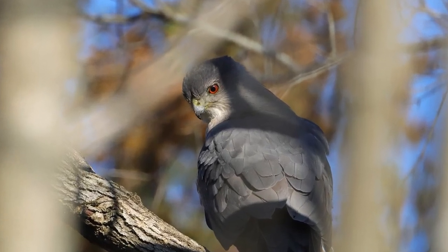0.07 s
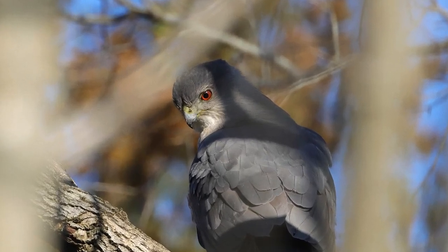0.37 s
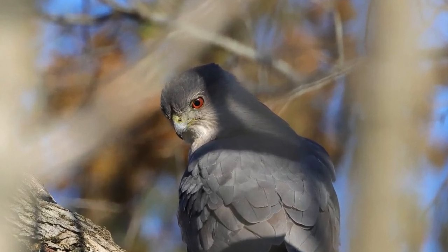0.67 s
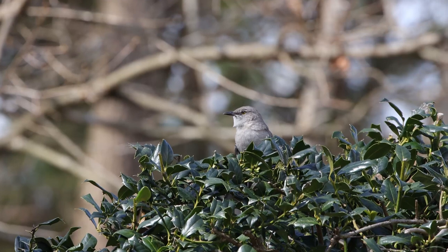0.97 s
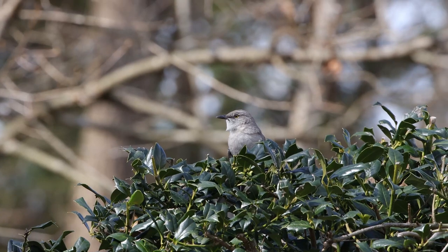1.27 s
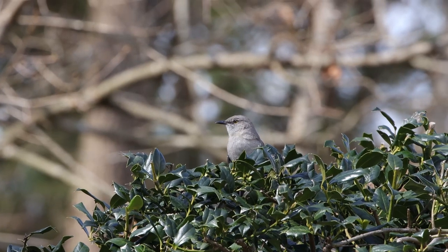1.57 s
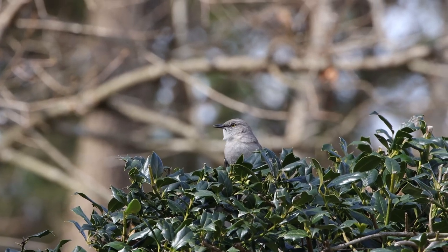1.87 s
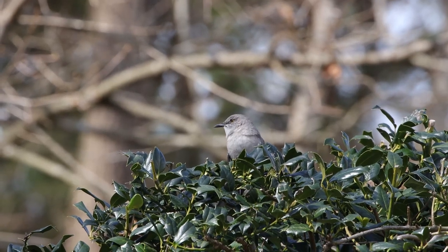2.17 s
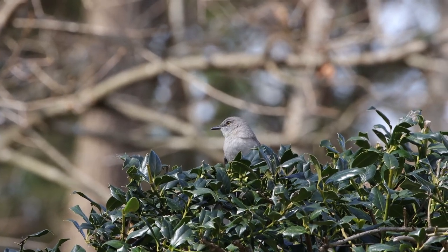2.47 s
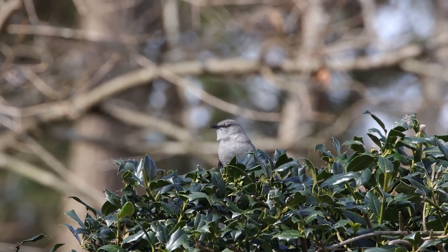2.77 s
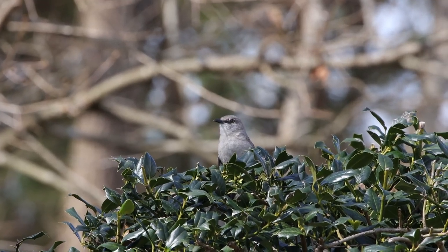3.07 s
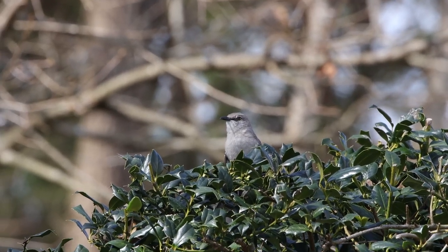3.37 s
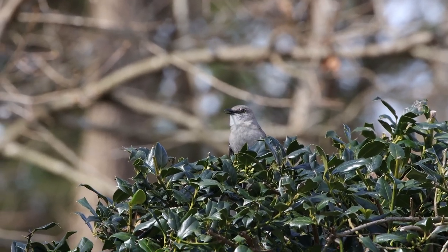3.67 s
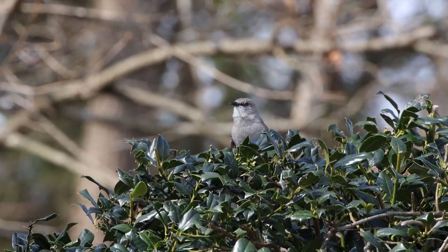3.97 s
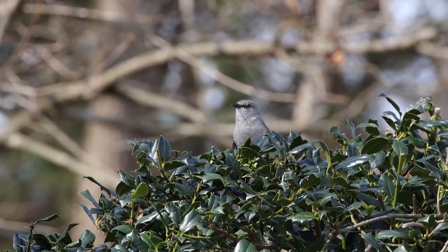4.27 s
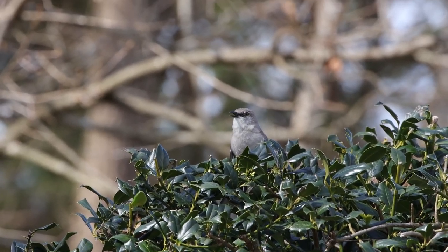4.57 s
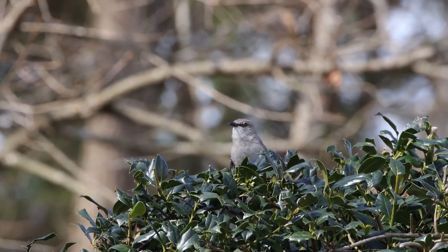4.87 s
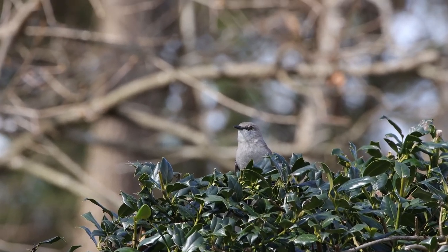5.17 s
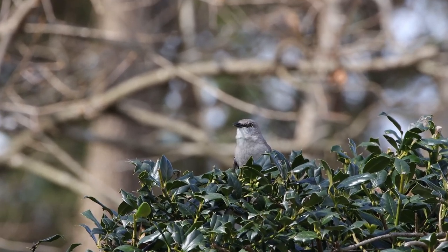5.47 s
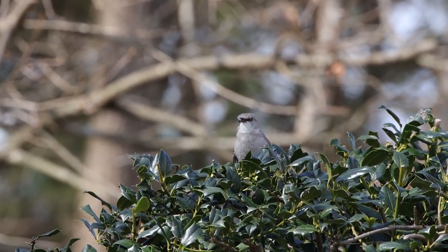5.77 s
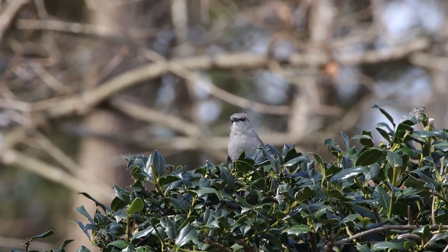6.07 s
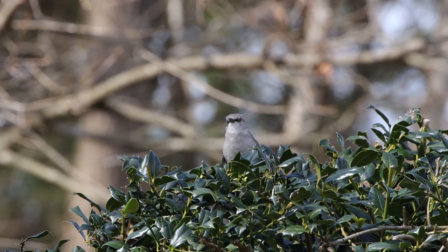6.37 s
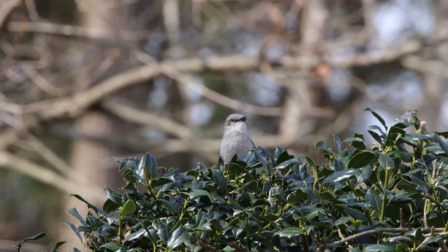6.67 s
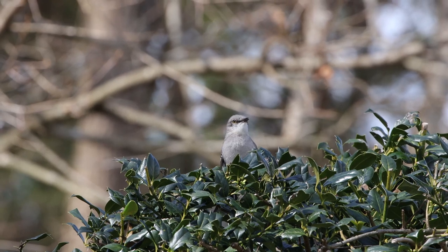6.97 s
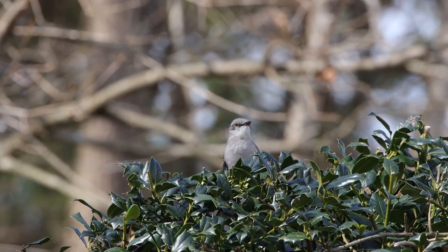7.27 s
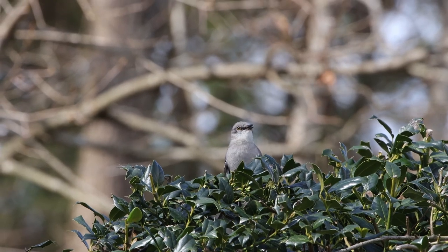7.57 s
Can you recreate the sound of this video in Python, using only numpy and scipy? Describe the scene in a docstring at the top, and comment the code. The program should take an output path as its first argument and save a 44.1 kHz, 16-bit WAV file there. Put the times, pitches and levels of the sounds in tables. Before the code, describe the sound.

Clear, gliding whistles from a close songbird in a wooded garden, with farther birds, a low traffic rumble and soft hiss behind.

```python
"""A wooded garden. A near songbird sings seven chip-and-whistle calls, then four phrases of downslur,
upslur and warble, and a last long upslur. Each note is a nearly pure, gliding tone from the syrinx.
A small bird gives thin high calls; others slur, trill, pip and rasp farther off, among faint dry ticks.
Trunks and foliage scatter the song over the rumble and drone of distant traffic and a steady hiss."""
import sys
import numpy as np
from scipy import signal
from scipy.fft import rfft, irfft, next_fast_len
from scipy.io import wavfile
from scipy.ndimage import uniform_filter1d, map_coordinates

SR = 44100
rng = np.random.default_rng(int(sys.argv[2]) if len(sys.argv) > 2 else 0)


def persist_wave(psi):
    """Save psi, clipped to +-1, as 16-bit WAV."""
    counts = np.round(np.clip(psi, -1, 1) * 32767).astype(np.int16)
    wavfile.write(sys.argv[1], SR, np.atleast_2d(counts).T)


N = 336483


def amp(db):
    return 10 ** (np.asarray(db) / 20)


def unit_rms(x):
    return x / np.sqrt(np.mean(x ** 2) + 1e-20)


def log_interp(points, hz):
    """Interpolate (f/Hz, value) points over log frequency."""
    knots_hz, values = np.transpose(points)
    return np.interp(np.log(hz + 1), np.log(knots_hz + 1), values)


def wobble(rate_hz, size):
    """Smooth random curve with rate_hz knots a second."""
    knots = rng.standard_normal(int(size * rate_hz / SR) + 4)
    return map_coordinates(knots, [np.arange(size) * rate_hz / SR])


def filtered(x, response):
    """Apply a complex frequency response."""
    size = next_fast_len(N + SR // 2)
    return irfft(rfft(x, size) * response(np.fft.rfftfreq(size, 1 / SR)), size)[..., :N]


def add(track, start_s, sound):
    part = track[max(round(start_s * SR), 0):][:len(sound)]
    part += sound[:len(part)]


def clock(length_s):
    return np.arange(int(length_s * SR)) / SR


def progress(length_s):
    return np.linspace(0, 1, int(length_s * SR))


# Left-right coherence of the background: f/Hz, coherence/1
COHERENCE = [(40, 0.9), (70, 0.99), (170, 0.93), (350, 0.89), (700, 0.45), (1400, 0), (4000, 0),
             (12000, 0.0092)]
def stereo_noise(spectrum, patchy_db):
    """Unit-rms noise with patches of random gain; the channels are alike in the bass only."""
    def mid_side_gains(hz):
        angle = np.arccos(np.clip(log_interp(COHERENCE, hz), -1, 1)) / 2
        return amp(log_interp(spectrum, hz)) * [np.cos(angle), np.sin(angle)]

    bins = signal.stft(rng.standard_normal((2, N)), nperseg=512)[2]
    patches = uniform_filter1d(rng.standard_normal(bins.shape[1:]), 6, axis=0)
    patches = unit_rms(uniform_filter1d(patches, 14, axis=1))
    pair = signal.istft(bins * amp(patchy_db * patches), nperseg=512)[1][:, :N]
    mid, side = filtered(pair, mid_side_gains)
    return unit_rms(np.array([mid + side, mid - side]))


# Background levels: t/s, rumble/dB, hiss/dB
BACKGROUND_LEVELS = [(0, -44, -52.5), (.1, -44, -53), (.57, -40, -48), (7.63, -40, -47)]
# Traffic spectrum: f/Hz, relative density/dB
RUMBLE_SPECTRUM = [(20, -24), (42, -20), (55, -7.5), (83, 0), (102, -5), (125, -1), (155, -2), (215, -7.5),
                   (340, -10), (520, -17.5), (800, -13.5), (1300, -21), (2200, -29), (4000, -73)]
# Engine drones: f/Hz, level/dB
ENGINE_DRONES = [(83, -48.5), (152, -54), (183, -53.5)]
# Hiss spectrum: f/Hz, relative density/dB
HISS_SPECTRUM = [(300, -28), (1000, 8.5), (2300, 12.5), (3300, 5.5), (4500, 2), (6500, -0.5), (9500, -2.5),
                 (12300, 1.5), (14000, -8.5), (15700, -21)]
def traffic_and_hiss():
    """Distant traffic rumbles and its engines waver under a gently flickering hiss."""
    t = np.arange(N) / SR
    knots_s, rumble_db, hiss_db = np.transpose(BACKGROUND_LEVELS)
    traffic_db = np.interp(t, knots_s, rumble_db)
    rumble = amp(traffic_db) * stereo_noise(RUMBLE_SPECTRUM, patchy_db=0.63)
    drone = sum(amp(db) * np.sin(2 * np.pi * hz * t + 1.68 * wobble(9, N)) for hz, db in ENGINE_DRONES)
    drone *= amp(traffic_db - traffic_db.max())
    flicker_db = .5 * wobble(6, N) + .5 * wobble(40, N)
    hiss = amp(np.interp(t, knots_s, hiss_db) + flicker_db) * stereo_noise(HISS_SPECTRUM, patchy_db=2.1)
    return (rumble + drone) * amp([[-.6], [.6]]) + hiss * amp([[-2], [1.5]])


def scatter(x, decay, delay_s):
    """Diffuse stereo echo; each frequency dies at its own rate."""
    hz, t, bins = signal.stft(rng.standard_normal((2, SR)), SR, nperseg=256)
    t60_s = log_interp(decay, hz)[:, None]
    tail = signal.istft(bins * amp(-60 * t / t60_s), SR, nperseg=256)[1]
    tail /= np.linalg.norm(tail[0])
    tail = np.pad(tail, ((0, 0), (int(delay_s * SR), 0)))
    return signal.fftconvolve(x[None], tail, axes=1)[:, :N]


# Foliage decay: f/Hz, T60/s
FOLIAGE_DECAY = [(1000, 1), (2500, 0.17), (8000, 0.15)]
# Woodland decay: f/Hz, T60/s
WOODS_DECAY = [(1000, 1.6), (2500, 0.81), (8000, 0.53)]
def garden_reverb(near, far, high):
    """Leaves scatter the song early and briefly, the woods later and for longer."""
    leaves = scatter(amp(-10.5) * near + amp(-2) * far + amp(-3) * high, FOLIAGE_DECAY, delay_s=.005)
    woods = scatter(amp(-16.5) * near + amp(-5.5) * far + amp(-12) * high, WOODS_DECAY, delay_s=.034)
    return (leaves + woods) * amp([[-1.5], [.5]])


# Trunk and ground reflections: delay/s, left/dB, right/dB
REFLECTIONS = [(.007, -20, -19), (.0125, -18, -15), (.022, -19, -18), (.031, -18, -18), (.044, -20, -20)]
def trunk_echoes(x):
    """Distinct echoes, each from its own side, that beat against the gliding notes."""
    skews_s = rng.normal(0, 0.00017, (len(REFLECTIONS), 2, 1))
    return filtered(x, lambda hz: sum(
        amp([[left_db], [right_db]]) * np.exp(-2j * np.pi * hz * (delay_s + skew_s))
        for (delay_s, left_db, right_db), skew_s in zip(REFLECTIONS, skews_s)))


def direct_path(x, left_db, right_db, left_lead_s):
    """Place a source by level and arrival-time difference."""
    return filtered(x, lambda hz: np.array([
        amp(left_db) * np.exp(2j * np.pi * hz * left_lead_s),
        amp(right_db) * np.ones_like(hz)]))


# Dry ticks: t/s, level/dB
TICKS = [(4.8344, -38), (5.1851, -39), (6.2113, -39), (6.3305, -35), (7.5294, -32)]
def ticks():
    """Tiny bright clicks: noise bursts that die in 8 ms."""
    out, t = np.zeros(N), clock(.02)
    for start_s, db in TICKS:
        add(out, start_s, amp(db - 9 - 60 * t / .008) * rng.standard_normal(len(t)))
    return filtered(out, lambda hz: amp(log_interp([(1000, -25), (4000, 0), (15000, -4)], hz)))


def syrinx(hz, overtone_db, jitter):
    """A bird's voice: a nearly pure tone with unsteady pitch and a weak octave."""
    phase = 2 * np.pi * np.cumsum(hz * (1 + jitter * wobble(410.6, len(hz)))) / SR
    return np.sin(phase) + amp(overtone_db) * np.sin(2 * phase)


def swell(u):
    """Rounded rise and fall over u = 0..1."""
    return np.sin(np.pi * u).clip(0) ** 0.35


def trill(length_s, first_hz, last_hz, swing_hz, rate_hz):
    """Hoarse glide with a fast pitch swing, loudest on each downstroke."""
    u = progress(length_s)
    cycle = 2 * np.pi * rate_hz * length_s * u + .9 * wobble(50, len(u))
    pitch = first_hz + (last_hz - first_hz) * u + swing_hz * np.cos(cycle)
    return swell(u) * (1 + 0.48 * np.sin(cycle)) * syrinx(pitch, overtone_db=-40, jitter=0.0152)


# Smooth slurs: t/s, length/s, first/Hz, last/Hz, level/dB
FAR_SLURS = [(0.076, 0.099, 2480, 2144, -37.5), (0.194, 0.082, 1973, 1830, -39),
             (0.352, .088, 2300, 2207, -31.5), (2.095, 0.081, 3270, 2850, -42.5),
             (4.467, 0.1, 1790, 2310, -43.5), (4.715, 0.0242, 4010, 4440, -33.5),
             (5.432, 0.12, 1777, 2414, -42.5), (5.704, 0.031, 3880, 4730, -36.5)]
# Very high pips: t/s, level/dB
FAR_PIPS = [(.158, -41.5), (2.246, -41.5), (5.11, -45)]
# Falling trill, then a lower buzz: t/s, first/Hz, trill/dB, buzz length/s, buzz/dB
FAR_SONGS = [(2.08, 4550, -52, .12, -44.5), (2.564, 4610, -45.5, 0.1, -55), (4.878, 4190, -45.5, 0.14, -49),
             (7.028, 4500, -42, .28, -39.5), (7.482, 4590, -37.5, 0.11, -42)]
# Trill that climbs, then holds: t/s, length/s, first/Hz, last/Hz, level/dB, swing/Hz, rate/Hz
CLIMBING_TRILL = [(2.305, .095, 4120, 5090, -45, 560, 52), (2.384, 0.107, 5050, 5240, -42.5, 120, 80)]
# Hoarse rasps: t/s, length/s, centre/Hz, width/Hz, level/dB
FAR_RASPS = [(0.138, 0.023, 2890, 1150, -35), (1.02, 0.023, 4400, 1300, -45),
             (1.824, 0.11, 3660, 450, -47.5), (3.543, 0.2, 2430, 660, -39),
             (4.011, 0.083, 3090, 600, -46.5), (5.074, 0.034, 2900, 800, -37.5),
             (5.938, 0.08, 3260, 604, -41.5)]
PIP_S, PIP_HZ = 0.019, 8120
SONG_FALL, BUZZ_AFTER_S, BUZZ_RATIO = 0.12, .09, .755
def far_birds():
    """Smooth slurs and pips, fast trills, and rasps whose pitch is chaotic."""
    out = np.zeros(N)
    for start_s, length_s, first_hz, last_hz, db in FAR_SLURS:
        u = progress(length_s)
        pitch = first_hz + (last_hz - first_hz) * u ** 1.45
        add(out, start_s, amp(db) * swell(u) * syrinx(pitch, overtone_db=-49, jitter=0.0032))
    for start_s, db in FAR_PIPS:
        u = progress(PIP_S)
        pitch = np.full(len(u), PIP_HZ)
        add(out, start_s, amp(db) * swell(u) * syrinx(pitch, overtone_db=-49, jitter=0.012))
    for start_s, first_hz, trill_db, buzz_s, buzz_db in FAR_SONGS:
        last_hz = first_hz * (1 - SONG_FALL)
        add(out, start_s, amp(trill_db) * trill(0.064, first_hz, last_hz, swing_hz=272, rate_hz=47))
        buzz = trill(buzz_s, BUZZ_RATIO * first_hz, BUZZ_RATIO * last_hz, swing_hz=163, rate_hz=66)
        add(out, start_s + BUZZ_AFTER_S, amp(buzz_db) * buzz)
    for start_s, length_s, first_hz, last_hz, db, swing_hz, rate_hz in CLIMBING_TRILL:
        add(out, start_s, amp(db) * trill(length_s, first_hz, last_hz, swing_hz, rate_hz))
    for start_s, length_s, centre_hz, width_hz, db in FAR_RASPS:
        u = progress(length_s)
        pitch = centre_hz + width_hz / 2 * wobble(1200, len(u))
        strength = swell(u) * wobble(488, len(u))
        add(out, start_s, amp(db) * strength * syrinx(pitch, overtone_db=-36, jitter=0.018))
    return out


def glide(t, target_hz, start_ratio, settle_s, steep):
    """Pitch that starts off its target and settles toward it."""
    return target_hz * (1 + (start_ratio - 1) * np.exp(-(t / settle_s) ** steep))


def envelope(t, attack_s, hold_s, decay_s, sag_db, release_s):
    """Swell, hold, sag, release."""
    rise_db = -22 * np.clip(1 - t / attack_s, 0, 1) ** 1.39
    fall_db = -sag_db * np.clip((t - attack_s - hold_s) / decay_s, 0, 1)
    gate = np.clip(np.minimum(t / 0.001, (t[-1] - t) / release_s), 0, 1)
    return amp(rise_db + fall_db) * gate


def note(pitch, strength, overtone_db, jitter, flutter_db):
    """Syrinx tone with a random level flutter."""
    return strength * amp(flutter_db * wobble(96.5, len(pitch))) * syrinx(pitch, overtone_db, jitter)


# Arched calls: t/s, length/s, top/Hz, level/dB
ARCH_CALLS = [(.11, 0.039, 6550, -37), (3.364, 0.023, 6100, -30), (4.361, 0.046, 6270, -32)]
# Downward swoop: t/s, length/s, target/Hz, level/dB
SWOOPS = [(5.558, 0.04, 7430, -33.5)]
def small_bird():
    """Thin, high contact calls and one steep swoop."""
    out = np.zeros(N)
    for start_s, length_s, hz, db in ARCH_CALLS:
        t = clock(length_s)
        pitch = glide(t, hz, start_ratio=.73, settle_s=0.14 * length_s, steep=1.25)
        strength = envelope(t, attack_s=.00047, hold_s=.00034, decay_s=.018, sag_db=17, release_s=.003)
        add(out, start_s, amp(db) * note(pitch, strength, overtone_db=-16.5, jitter=.016, flutter_db=.5))
    for start_s, length_s, hz, db in SWOOPS:
        t = clock(length_s)
        pitch = glide(t, hz, start_ratio=1.47, settle_s=0.013, steep=2.23)
        strength = envelope(t, attack_s=.014, hold_s=.0072, decay_s=.008, sag_db=6, release_s=.0095)
        add(out, start_s, amp(db) * note(pitch, strength, overtone_db=-26, jitter=.005, flutter_db=1))
    return out


def chip(hz, length_s=0.0358, bend=0.107):
    """Short note whose pitch dips and climbs again."""
    t = clock(length_s)
    pitch = hz * (1 + bend * (2 * t / length_s - .97) ** 2)
    strength = envelope(t, attack_s=.022, hold_s=.0032, decay_s=.0054, sag_db=19, release_s=.0054)
    return note(pitch, strength, overtone_db=-31, jitter=0.0032, flutter_db=-3.5)


def flick(first_hz=3023, length_s=.015, fall=0.38):
    """Rough, accelerating plunge that ends the chip."""
    t = clock(length_s)
    pitch = first_hz * (1 - fall * (t / length_s) ** 2.7)
    rasp = 1 + .028 * wobble(700, len(t))
    strength = envelope(t, attack_s=.005, hold_s=.006, decay_s=.004, sag_db=1, release_s=.003)
    return note(pitch * rasp, strength, overtone_db=-25.5, jitter=0.022, flutter_db=4)


def whistle(hz, length_s=.15, fall=0.1457, scoop_s=0.0051):
    """Long note that scoops up, then sinks through hz as it fades."""
    t = clock(length_s)
    scoop = 0.06 * np.exp(-t / scoop_s)
    pitch = hz * (1 + fall * (.39 - t / length_s) - scoop)
    strength = envelope(t, attack_s=.036, hold_s=.027, decay_s=.067, sag_db=16, release_s=.0076)
    return note(pitch, strength, overtone_db=-37, jitter=0.0042, flutter_db=1.8)


def downslur(target_hz, length_s=0.075, fade_in_s=0.016):
    """Steep fall that levels out, loudest on the way down."""
    t = clock(length_s)
    pitch = glide(t, target_hz, start_ratio=1.377, settle_s=.027, steep=1.28)
    strength = envelope(t, attack_s=.028, hold_s=.0011, decay_s=.0043, sag_db=6.5, release_s=.0053)
    strength *= np.clip(t / fade_in_s, 0, 1)
    return note(pitch, strength, overtone_db=-35, jitter=0.0018, flutter_db=0.5)


def upslur(length_s=0.0796):
    """Rise to a held top note; the timing scales with the length."""
    t = clock(length_s)
    pitch = glide(t, target_hz=2630, start_ratio=.895, settle_s=0.367 * length_s, steep=2.4)
    strength = envelope(t, attack_s=.34 * length_s, hold_s=.06 * length_s, decay_s=.21 * length_s,
                        sag_db=8.5, release_s=.067 * length_s)
    return note(pitch, strength, overtone_db=-39, jitter=.002, flutter_db=.8)


# Peaks of effort: position/share of the warble, level/dB
WARBLE_CRESTS = [(.43, -0.5), (0.689, -1.5), (.89, -16.5)]
def warble(length_s, low_hz=2010, lead_hz=2330, crest_hz=2620, sink=0.041):
    """Sinking lead-in, then quick, uneven peaks of effort that lift pitch and strength together."""
    t = clock(length_s)
    u = t / length_s
    lead = np.exp(-(u / .25) ** 3)
    positions, levels_db = np.transpose(WARBLE_CRESTS)
    positions = positions + rng.normal(0, .006, len(positions))
    crests = [np.exp(-np.abs((u - at) / .062) ** 1.99) for at in positions]
    pitch = low_hz + (lead_hz - low_hz) * lead + (crest_hz - low_hz) * sum(crests)
    pitch *= 1 + sink * (.5 - u)
    accents = sum(amp(db) * crest for db, crest in zip(levels_db, crests))
    effort = amp(-7) + amp(-10) * lead + amp(-5) * accents
    strength = effort * envelope(t, attack_s=.012, hold_s=.12, decay_s=.062, sag_db=4.5, release_s=.0021)
    return note(pitch, strength, overtone_db=-40, jitter=.013, flutter_db=2)


# Chip-and-whistle calls: t/s, chip/Hz, chip/dB, flick/dB, whistle/Hz, whistle/dB
CALLS = [(.358, 2630, -21, -30, 2135, -19.5), (.623, 2730, -21, -18.5, 2140, -16.5),
         (.941, 2700, -18.5, -21, 2113, -18), (1.245, 2576, -15.5, -27, 2141, -19.5),
         (1.896, 2675, -24, -22, 2164, -16.5), (2.178, 2560, -13.5, -27, 2154, -17.5),
         (2.82, 2646, -26.5, -29, 2151, -19.5)]
# Slur pair opening each phrase: t/s, downslur target/Hz, downslur/dB, upslur/dB
SLUR_PAIRS = [(3.637, 2157, -10.5, -14.5), (4.548, 2110, -10.5, -11.5), (5.578, 2166, -11.5, -13.5),
              (6.54, 2146, -11, -12.5)]
# Warble closing each phrase: t/s, length/s, level/dB
WARBLES = [(3.903, .16, -21.5), (4.794, .19, -20), (5.862, .16, -20), (6.812, .17, -20.5)]
# Drawn-out last upslur: t/s, length/s, level/dB
LONE_UPSLURS = [(7.579, 0.1256, -10.5)]
FLICK_AFTER_S, WHISTLE_AFTER_S, UPSLUR_AFTER_S = .03, .057, .13
def singer():
    """The near bird: chip, flick and whistle in each call, then the slurred phrases."""
    out = np.zeros(N)
    for start_s, chip_hz, chip_db, flick_db, whistle_hz, whistle_db in CALLS:
        add(out, start_s, amp(chip_db) * chip(chip_hz))
        add(out, start_s + FLICK_AFTER_S, amp(flick_db) * flick())
        add(out, start_s + WHISTLE_AFTER_S, amp(whistle_db) * whistle(whistle_hz))
    for start_s, down_hz, down_db, up_db in SLUR_PAIRS:
        add(out, start_s, amp(down_db) * downslur(down_hz))
        add(out, start_s + UPSLUR_AFTER_S, amp(up_db) * upslur())
    for start_s, length_s, db in WARBLES:
        add(out, start_s, amp(db) * warble(length_s))
    for start_s, length_s, db in LONE_UPSLURS:
        add(out, start_s, amp(db) * upslur(length_s))
    return out


def scene():
    """The singer sits to the right; the farther a bird, the more of its sound arrives scattered."""
    near, far, high = singer(), far_birds(), small_bird()
    direct = direct_path(near, left_db=-11.5, right_db=0.5, left_lead_s=-45e-6)
    direct += direct_path(far, left_db=-1.5, right_db=-1.5, left_lead_s=40e-6)
    direct += direct_path(high + ticks(), left_db=-2, right_db=1, left_lead_s=0)
    return direct + garden_reverb(near, far, high) + trunk_echoes(near + high) + traffic_and_hiss()


BAND_LIMIT_HZ = 15680
def record(dry):
    """Brick-wall low-pass."""
    return filtered(dry, lambda hz: hz < BAND_LIMIT_HZ)


dry = scene()
out = record(dry)
persist_wave(out)
```